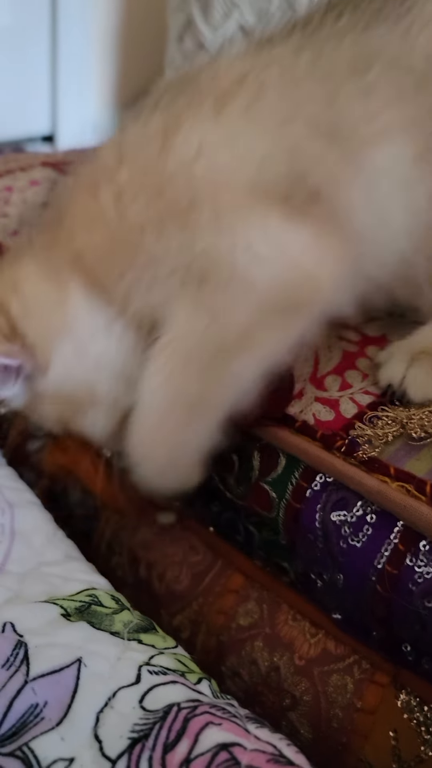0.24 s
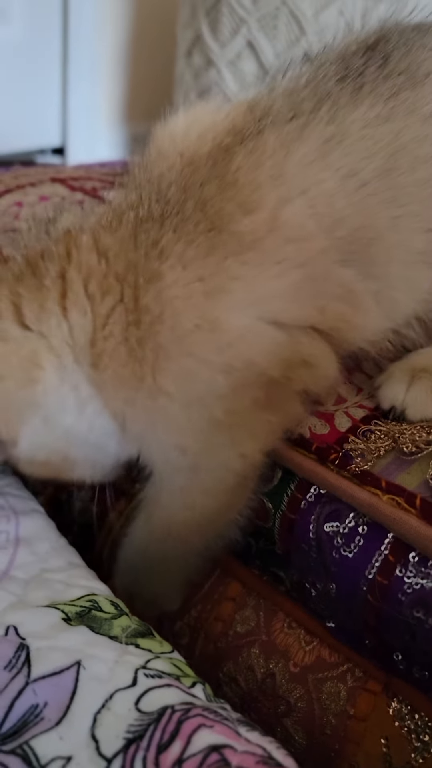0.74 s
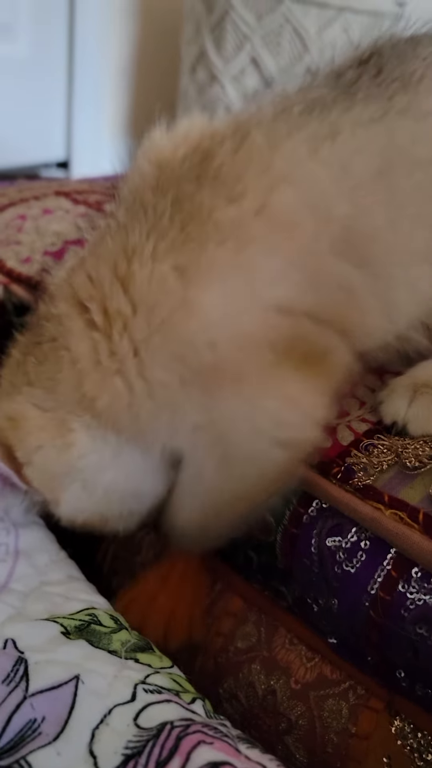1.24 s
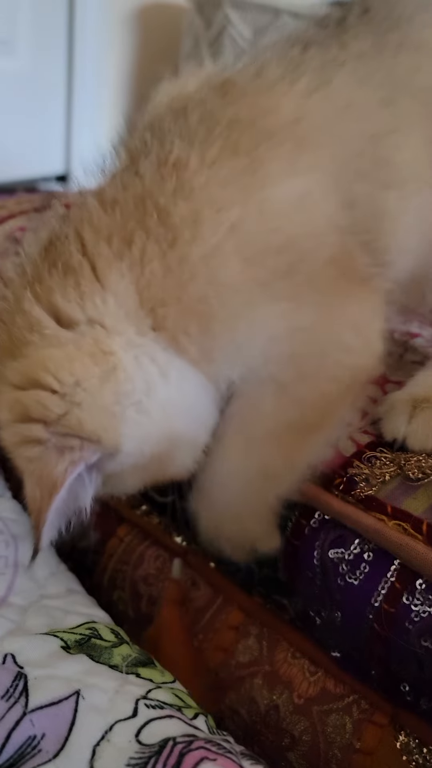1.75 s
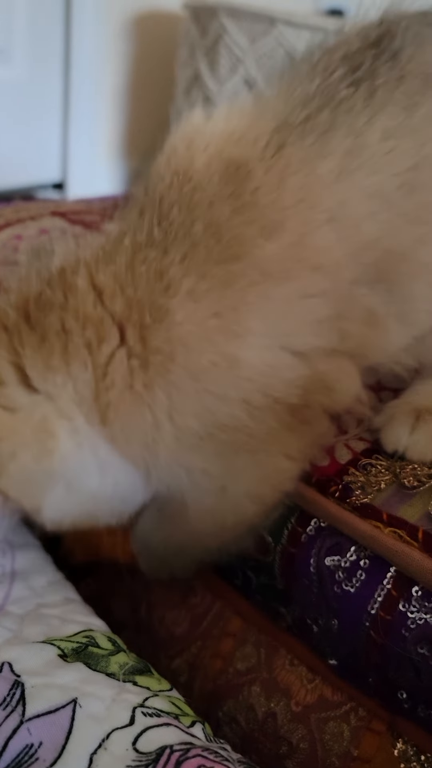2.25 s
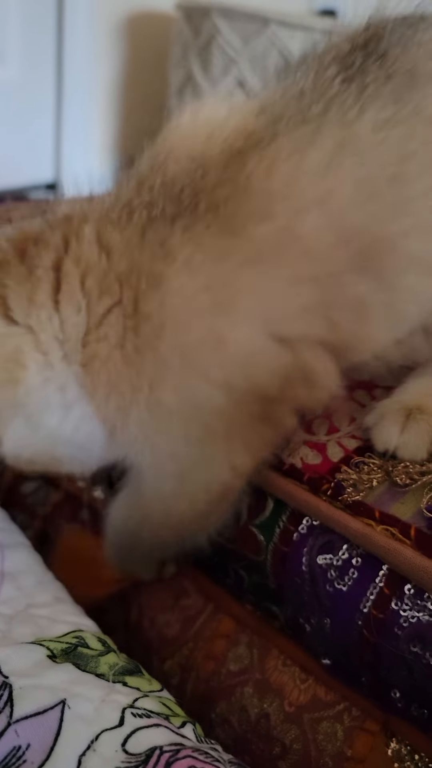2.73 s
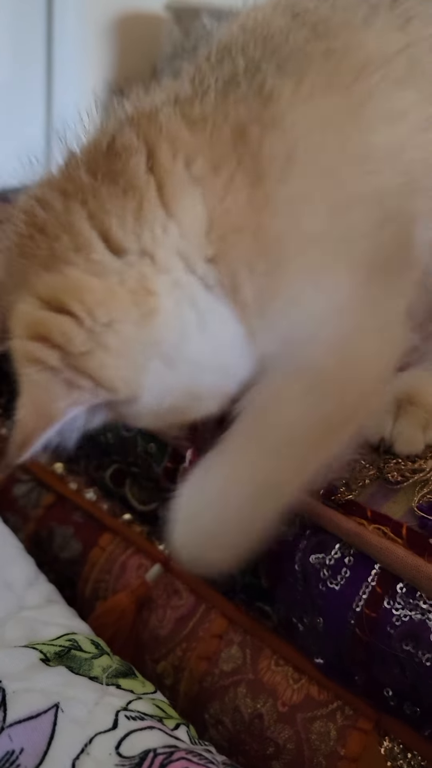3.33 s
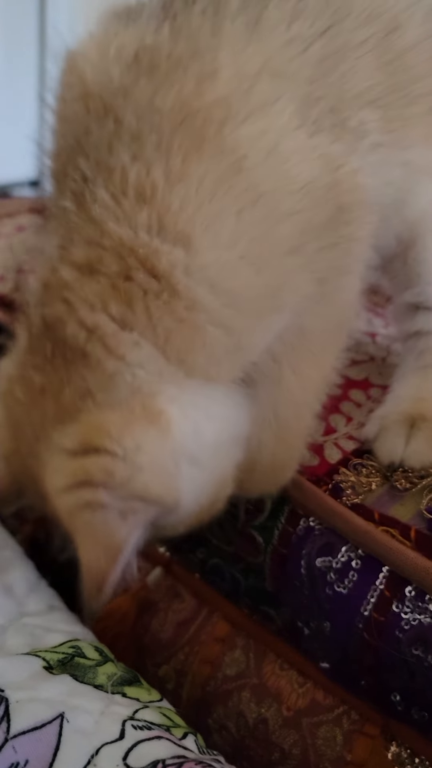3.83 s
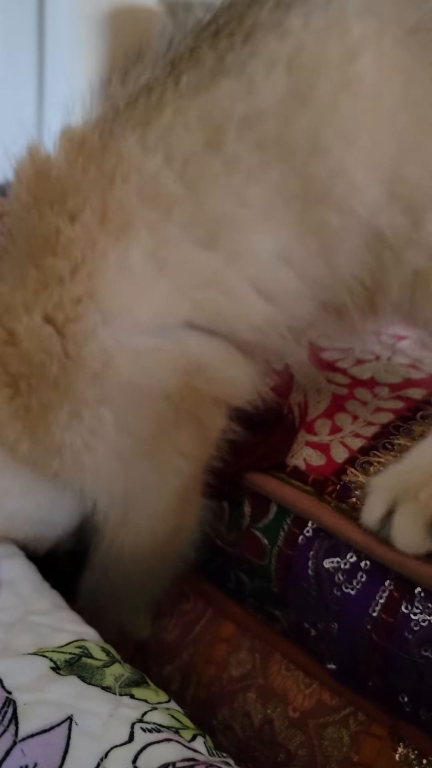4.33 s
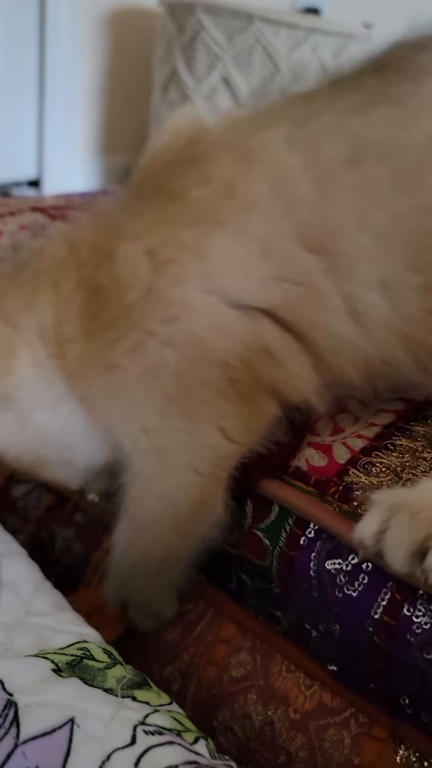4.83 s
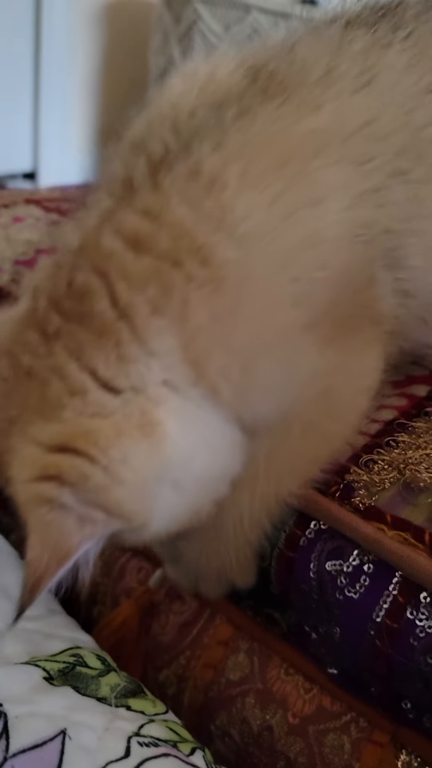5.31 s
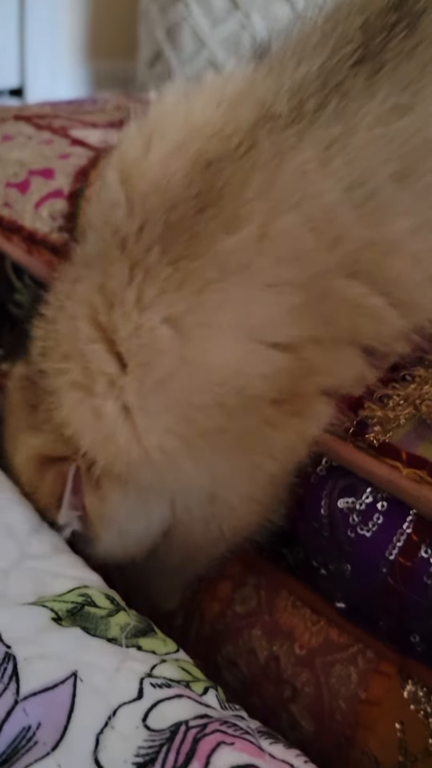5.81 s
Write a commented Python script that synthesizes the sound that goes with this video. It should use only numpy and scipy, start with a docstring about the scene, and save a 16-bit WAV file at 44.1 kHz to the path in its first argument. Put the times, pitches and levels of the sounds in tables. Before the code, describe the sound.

A kitten digs between embroidered pillows: claws snag and snap off threads with small clicks and dull thumps, dry fur-and-cloth rustles, faint low hum beneath.

```python
"""On a bed, a kitten digs between embroidered pillows: claws snag threads and snap free, thumping the stuffing.
Snaps and thumps are clicks ringing the modes of thread and pillow; short tones of steady pitch, quickly
dying away, puff the air. Fur and cloth rustle as fibre slips over noise. Two far motors beat slowly over
mains hum, airflow and room noise. Faint wall echoes and a diffuse tail follow the snaps, thumps and puffs.
A small two-port microphone is held close."""
import sys
import numpy as np
from scipy import signal
from scipy.io import wavfile

SR = 44100
rng = np.random.default_rng(int(sys.argv[2]) if len(sys.argv) > 2 else 0)


def persist_wave(psi):
    """Save psi, clipped to +-1, as 16-bit WAV."""
    counts = np.round(np.clip(psi, -1, 1) * 32767).astype(np.int16)
    wavfile.write(sys.argv[1], SR, np.atleast_2d(counts).T)


def invert_db(level):
    """Linear amplitude ratio for a level in decibels (20 dB per decade), elementwise."""
    return 10 ** (np.asarray(level, dtype=float) / 20)


N = 267584   # length in samples

# Two motors, then the mains. Each row: pitch in Hz, level in dB rms ahead of wobble and port tilt.
HUM_TONES = [(59.0, -51), (58.19, -57), (120.0, -58)]
MOTORS_IN_STEP_S = 0.87
# Colour of the room noise. Each row: frequency in Hz, relative density in dB per Hz.
ROOM_COLOUR = [(20, -20), (55, -1.5), (90, -12), (150, -12.5), (200, -12.5), (280, -31.5), (500, -27),
               (650, -35.5), (900, -29), (1900, -38), (2400, -48), (3000, -46), (4500, -54), (7000, -53.5),
               (9500, -65), (11500, -63), (13500, -61.5), (16500, -61)]
ROOM_DB = -55.5   # rms
# Left-right likeness of diffuse noise. Each row: frequency in Hz, likeness from -1 to 1.
LIKENESS = [(60, 0.84), (130, 1), (290, 0.5), (640, -0.65), (1410, -0.64), (3100, 0.015), (6820, -0.057),
            (15000, -0.073)]
# Tilt between the microphone ports. Each row: frequency in Hz, left minus right in dB.
PORT_TILT = [(60, -4.5), (150, -4.0), (380, -7), (950, -2), (2380, 6.5), (5980, 1.5), (15000, -5)]
# Plain wall echoes. Each row: delay in seconds, level in dB.
WALL_ECHOES = [(.0157, -24), (.0303, -33)]
BEDROOM_T60_S, TREBLE_T60_S, WALL_CUT_HZ = 0.57, 0.15, 600
# Airflow resonances. Each row: centre in Hz, width in Hz, level in dB rms.
AIRFLOW = [(207.6, 32, -69.5), (1958, 100, -85.5), (2890, 160, -90.5)]
# A narrow hiss swells now and then. Each row: start of the hold in seconds, hold in seconds, level in dB rms.
HISS_SWELLS = [(0.154, 0.14, -85), (1.62, 0.055, -92), (2.65, 0.1, -93), (3.254, 0.85, -86),
               (4.474, 0.1, -91), (5.596, .47, -91)]
HISS_HZ, HISS_WIDTH_HZ = 6740, 730
HISS_RISE_DB_PER_S, HISS_FALL_DB_PER_S, HISS_REST_DB = 75, 52, -101
# Colour of the fine fibres. Each row: frequency in Hz, relative density in dB per Hz.
FIBRE_COLOUR = [(1760, -30.5), (3000, -6), (3520, -11), (4110, -3.5), (6480, -11), (8230, -7.5),
                (10500, -36.5), (16000, -18)]
# Colour of the coarse weave. Each row: frequency in Hz, relative density in dB per Hz.
WEAVE_COLOUR = [(500, -3.5), (800, 5), (1500, -3.5), (2500, -13), (3500, -12.5)]
# The paw drags cloth over cloth. Each row: moment of greatest speed in seconds, hold in seconds,
# fine fibre level in dB, coarse weave level in dB.
STROKES = [(0.156, 0.023, -68.5, -62), (0.253, 0.026, -81.5, -64), (0.538, .15, -90, -84),
           (0.873, 0.009, -85, -78), (0.957, .02, -74, -68), (1.348, .012, -71, -61.5),
           (1.362, 0.0057, -66, -54), (1.596, 0.015, -71.5, -66.5), (1.77, 0.2, -88, -75),
           (1.98, 0.025, -89, -65.5), (2.09, 0.0052, -75, -65), (2.193, 0.013, -80, -79),
           (2.51, 0.02, -71.5, -62.5), (2.643, 0.013, -77, -66.5), (2.72, 0.056, -79.5, -75),
           (2.852, 0.022, -78, -74), (3.046, 0.015, -81, -65), (3.16, .02, -94, -75),
           (3.228, 0.062, -83, -67.5), (3.549, 0.03, -80, -66), (3.935, 0.023, -75, -67),
           (4.238, 0.022, -68, -64.5), (4.3, 0.039, -75.5, -71.5), (4.542, .02, -80, -66),
           (4.616, 0.08, -83, -68), (4.763, 0.018, -81, -70), (4.918, 0.042, -67.5, -60.5),
           (5.002, 0.077, -83.5, -67), (5.238, 0.032, -79, -80), (5.351, .03, -80, -71),
           (5.6, .03, -86, -73), (5.843, 0.036, -85.5, -69.5), (6.042, .03, -82, -67)]
RISE_DB_PER_S, FINE_FALL_DB_PER_S, WEAVE_FALL_DB_PER_S = 708, 296, 180
REST_FINE_DB, REST_WEAVE_DB = -98.5, -83.5   # fur stirring between strokes
# A claw snags a thread and the cloth springs back. Each row: start in seconds, nominal snap peak in dB,
# nominal thump peak in dB, pitch of the spot in Hz, brightness setting in dB.
SNAGS = [(0.1604, -22, -24.5, 288, 0), (0.88, -50, -45.5, 416, -3), (0.9552, -45, -41, 327, -24),
         (0.9628, -38, -25, 367, -3), (1.3549, -35, -27.5, 408, -36), (1.3726, -35, -30, 380, -18),
         (1.3758, -37.5, -37.5, 396, -0.5), (1.5869, -47, -36, 380, 9), (1.594, -39.5, -23, 213, 10.5),
         (1.7638, -54, -42, 227, -9), (1.9893, -50.5, -41, 219, -1), (2.094, -44, -39, 335, -1),
         (2.5012, -50, -33, 276, 5), (2.5134, -32, -22.5, 253, 5), (2.643, -53.5, -48.5, 330, -28),
         (2.6602, -53, -46.5, 326, -34), (2.857, -47, -30.5, 236, 7.5), (3.063, -59, -42.5, 305.5, 0),
         (3.2355, -54.5, -47.5, 318, -1), (3.2506, -44, -34.5, 343, -4), (3.5495, -58, -45, 310, -22),
         (3.56, -45.5, -39.5, 347, -33), (3.9289, -55, -33.5, 244, -23), (4.2626, -62, -43, 298, -22),
         (4.5311, -59.5, -34, 345, 8), (4.543, -47, -27, 364, -27.5), (4.554, -61, -51, 260, 15),
         (4.9374, -34, -27.5, 324, -12), (4.9431, -51, -47.5, 302, -12), (5.6213, -60, -43, 200, 1)]
# A claw tip ticks over a thread, hardly moving the pillow. Each row: start in seconds,
# nominal snap peak in dB, brightness setting in dB.
TICKS = [(1.3787, -30.5, -7), (1.3827, -49, -6), (1.7743, -56.5, -2), (1.7847, -51.5, -10),
         (1.8189, -53.5, 2.5), (1.829, -54.5, -18), (1.8615, -62, 6), (1.9155, -53, -7),
         (1.9364, -51.5, -5), (3.05, -50, -10), (3.1682, -56, -9), (3.175, -56.5, -10), (3.409, -53.5, -19),
         (3.872, -65, 0), (4.036, -74, 9), (5.135, -65, 2), (3.578, -66, -13), (4.239, -50, -6),
         (4.3094, -56.5, -17), (4.331, -55.5, 2), (4.9286, -43.5, 7.5), (5.385, -63.5, -15)]
# The thump of a -56 dB tick, its share of the snap's swing, and its pitch.
TICK_THUMP_DB, TICK_FOLLOWS, TICK_SPOT_HZ = -55, 0.32, 260
# A soft pad presses the pillow. Each row: start in seconds, nominal thump peak in dB, pitch of the spot in Hz.
PRESSES = [(0.2546, -42, 292), (0.3982, -41, 226), (0.6526, -45, 196), (0.9483, -34.5, 340),
           (1.2125, -46, 211), (1.6272, -43, 230), (1.9812, -55, 306), (2.1084, -42, 225),
           (2.189, -36.5, 262), (2.196, -33, 340), (2.2018, -40.5, 263), (2.5464, -53, 250),
           (3.073, -46.5, 221), (3.4556, -43.5, 239), (3.944, -53, 262), (4.7575, -49.5, 243.6),
           (4.7712, -45, 286), (5.078, -50.5, 406), (5.2546, -46.5, 280), (5.8558, -45.5, 277),
           (6.0399, -43, 532), (6.0494, -38.5, 356)]
# The faint dull snap of a -46 dB press, its share of the thump's swing, and its brightness.
PRESS_SNAP_DB, PRESS_FOLLOWS, PRESS_BRIGHT_DB = -73, 0.21, -29.5
# The paw digs where the lows reach the ports out of step. Each row: from in seconds, to in seconds.
BEHIND = [(1.34, 1.37), (2.63, 2.7), (3.34, 3.42)]
# Left share of the lows at a 280 Hz spot; higher spots lean right.
LEFT_SHARE, LEFT_LOSS_PER_OCTAVE, LEFT_SHARE_BEHIND = 0.21, 0.17, -0.2
# Modes of the stuffed pillow. Each row: pitch in Hz, relative level in dB, decay by 60 dB in seconds.
PILLOW_MODES = [(79.3, -2, 0.81), (149.5, -6.5, 0.34), (200, 0, 0.12), (240.5, -0.5, 0.12),
                (291.2, -3, 0.06), (340, -7, 0.065), (380, 3.5, 0.058), (483.6, -1, 0.046),
                (542.3, 9.5, 0.022), (783, 7.5, 0.018), (920, -23.5, 0.017)]
# Modes of a released thread. Each row: pitch in Hz, relative level in dB, decay by 60 dB in seconds.
THREAD_MODES = [(708, -2, 0.0059), (1090, 4.5, 0.0013), (1345, 3.5, 0.0023), (1713, 6.5, 0.002),
                (3110, 3.5, 0.004), (3790, 6.5, 0.0017), (5250, 6, 0.0019), (8370, -3.5, 0.0023),
                (10100, -8.5, 0.001), (14100, -8, 0.00068)]


def rms_one(x):
    """Scales a signal to rms 1."""
    return x / np.sqrt(np.mean(x ** 2) + 1e-20)


def at_hz(points, hz):
    """Reads a curve at a frequency, straight over log frequency."""
    freqs, values = np.array(points).T[:2]
    return np.interp(np.log(hz), np.log(freqs), values)


def drift(rate_hz):
    """Slow chance of spread 1: noise at every 40th sample through a double one-pole low-pass."""
    r = np.exp(-80 * np.pi * rate_hz / SR)
    noise = rng.standard_normal(N // 40 + 2002)
    slow = signal.lfilter([1], [1, -2 * r, r * r], noise)[2000:]   # skip the settling
    return np.interp(np.arange(N) / 40, np.arange(len(slow)), rms_one(slow))


def swells(s, hold_s, db, rise_db_per_s, fall_db_per_s, rest_db):
    """Level in dB: each swell rises, holds and falls; powers add over a resting level."""
    t = np.arange(0, N + 64, 64)[:, None] / SR
    rise_db = rise_db_per_s * np.maximum(s - t, 0)
    fall_db = fall_db_per_s * np.maximum(t - s - hold_s, 0)
    power = invert_db(2 * (db - rise_db - fall_db)).sum(axis=1) + invert_db(2 * rest_db)
    return np.interp(np.arange(N) / SR, t[:, 0], 10 * np.log10(power))


def ring(clicks, hz, t60):
    """A decaying resonance: a unit click sets a sine of height 1 ringing."""
    r, w = invert_db(-60 / (t60 * SR)), 2 * np.pi * hz / SR
    return signal.lfilter([0, np.sin(w)], [1, -2 * r * np.cos(w), r * r], clicks + 1e-18)


def narrow_noise(hz, width_hz):
    """Noise through one resonance, twice, partly shared by the ports; rms 1."""
    r, w = np.exp(-np.pi * width_hz / SR), 2 * np.pi * hz / SR
    section = [1, 0, -1, 1, -2 * r * np.cos(w), r * r]
    common, own = rng.standard_normal(N), rng.standard_normal((2, N))
    alike = np.clip(at_hz(LIKENESS, hz), 0, 1)
    both = np.sqrt(alike) * common + np.sqrt(1 - alike) * own
    return rms_one(signal.sosfilt([section, section], both))


def coloured(sources, spectrum, patchy_db):
    """Third-octave bands of mid and side sources, each with its own level, flicker and likeness; rms 1."""
    out, edges = 0, 20 * 2 ** np.arange(0, 9.8, 1 / 3)
    for k, (low, high) in enumerate(zip(edges, edges[1:])):
        hz = np.sqrt(low * high)
        if spectrum[0][0] <= hz <= spectrum[-1][0]:
            band = signal.butter(2, [low, high], "band", fs=SR, output="sos")
            mid, side = signal.sosfilt(band, sources[k % 2])   # neighbouring bands use separate sources
            alike = np.clip(at_hz(LIKENESS, hz), -1, 1)
            tilt_db = at_hz(PORT_TILT, hz) * np.array([[0.5], [-0.5]])
            gain = invert_db(at_hz(spectrum, hz) + patchy_db * drift(8) + tilt_db)
            out = out + gain * (np.sqrt(1 + alike) * mid + np.sqrt(1 - alike) * side * [[1], [-1]])
    return rms_one(out)


def room_noise():
    """Room noise: broad noise whose bands flicker gently."""
    return invert_db(ROOM_DB) * coloured(rng.standard_normal((2, 2, N)), ROOM_COLOUR, patchy_db=1.8)


def hum():
    """Motor and mains tones with a slight wobble; the two motors beat as they drift in and out of step."""
    t = np.arange(N) / SR - MOTORS_IN_STEP_S
    out = 0
    for hz, db in HUM_TONES:
        port_gain = invert_db(at_hz(PORT_TILT, hz) * np.array([[0.4], [-0.4]]))
        out = out + invert_db(db + 0.14 * drift(4.8)) * np.cos(2 * np.pi * hz * t) * port_gain
    return np.sqrt(2) * out   # rms to peak


def airflow():
    """Steady airflow: noise in a few narrow resonances."""
    return sum(invert_db(db) * narrow_noise(hz, width_hz) for hz, width_hz, db in AIRFLOW)


def hiss():
    """A narrow high hiss that comes and goes over a faint rest."""
    level_db = swells(*np.transpose(HISS_SWELLS), HISS_RISE_DB_PER_S, HISS_FALL_DB_PER_S, HISS_REST_DB)
    return invert_db(level_db) * narrow_noise(HISS_HZ, HISS_WIDTH_HZ)


def bedroom(x):
    """Two plain wall echoes, and a diffuse tail that swells in, its treble dying first."""
    t = np.arange(int(0.4 * SR)) / SR
    white = rng.standard_normal((2, len(t))) * (1 - np.exp(-(t / 0.04) ** 2))
    dull = signal.sosfilt(signal.butter(1, WALL_CUT_HZ, fs=SR, output="sos"), white)
    treble = invert_db(-14) * (white - dull) * invert_db(-60 * t / TREBLE_T60_S)
    tail = dull * invert_db(-60 * t / BEDROOM_T60_S) + treble
    out = invert_db(-48) * signal.fftconvolve(x, tail, axes=1)[:, :N]
    for delay_s, db in WALL_ECHOES:
        lag = int(delay_s * SR)
        out[:, lag:] += invert_db(db) * x[:, :-lag]
    return out


def rustle(fine_db, weave_db):
    """Hundreds of tiny fibre slips a second on a soft hiss, coloured as fine fibres and coarse weave."""
    shape = (2, 2, N)
    happens = rng.random(N) < 900 / SR   # 900 slips a second
    size = invert_db(6.34 * np.minimum(rng.exponential(1, N), 3))
    grains = happens * size * rng.standard_normal(shape)
    slips = 2.0 * grains + rng.standard_normal(shape)
    fine = invert_db(fine_db) * coloured(slips, FIBRE_COLOUR, patchy_db=2.2)
    return fine + invert_db(weave_db) * coloured(slips, WEAVE_COLOUR, patchy_db=2.5)


def contacts():
    """All touches as columns: s, snap dB, thump dB, spot Hz, brightness dB, left share of the lows."""
    ticks = [(s, db, TICK_THUMP_DB + TICK_FOLLOWS * (db + 56), TICK_SPOT_HZ, bright_db)
             for s, db, bright_db in TICKS]
    presses = [(s, PRESS_SNAP_DB + PRESS_FOLLOWS * (db + 46), db, hz, PRESS_BRIGHT_DB)
               for s, db, hz in PRESSES]
    columns = np.transpose(SNAGS + ticks + presses)
    left = LEFT_SHARE - LEFT_LOSS_PER_OCTAVE * np.log2(columns[3] / 280)
    behind = sum((columns[0] > a) & (columns[0] < b) for a, b in BEHIND) > 0
    return (*columns, np.where(behind, LEFT_SHARE_BEHIND, np.maximum(left, 0)))


def puffs():
    """The cloth jumping free pushes the air for a cycle or two, a little above the pitch of the spot."""
    s, _, thump_db, spot_hz, _, left = contacts()
    out, t = np.zeros((2, N + 900)), np.arange(900) / SR
    for at, db, hz, share in zip((s * SR).astype(int), thump_db - 1.5, 1.55 * spot_hz, left):
        cycles = hz * t
        puff = invert_db(db - 10.4 * cycles) * np.sin(2 * np.pi * cycles)
        out[:, at:at + len(t)] += puff * [[1.3 * share], [1]]
    return out[:, :N]


def thumps(weave_db):
    """Cloth springs back on the stuffing; modes near the spot's pitch ring most, low ones start later."""
    s, _, thump_db, spot_hz, _, left = contacts()
    out = np.zeros((2, N))
    chance = rng.standard_normal((len(s), 2, len(PILLOW_MODES)))
    for k, (hz, level_db, t60) in enumerate(PILLOW_MODES):
        at = ((s + (0.53 + 0.27 * np.abs(chance[:, 1, k])) / hz) * SR).astype(int)
        octaves_squared = np.log2(hz / spot_hz) ** 2
        off_pitch_db = 30 * octaves_squared / (1 + 2.18 * octaves_squared)
        blow = invert_db(thump_db + level_db - 8.0 - off_pitch_db + 1.87 * chance[:, 0, k])
        # sliding paws stir the stuffing too
        force = invert_db(weave_db - 34) * rng.standard_normal(N) * [[0.5], [1]]
        near = np.clip(200 / hz, 0, 1) ** 0.96   # long waves reach both ports alike
        force[0, at] -= blow * (0.63 * near + (1 - near) * 1.05 * left)
        force[1, at + int(hz / 80)] -= blow
        out += ring(force, hz, t60)
    return out


def snaps():
    """A thread slips off the claw in one crack and three small jerks within milliseconds, ringing its modes."""
    s, snap_db, _, _, bright_db, left = contacts()
    out = np.zeros((2, N))
    blend = rng.standard_normal((len(s), 2, len(THREAD_MODES)))   # each port hears its own blend of modes
    jerks = np.minimum(rng.exponential(1, (len(s), 2, 4)), 2) * [0, 1, 1, 1]
    light = np.clip(-27.5 - snap_db, 0, 35)   # light touches drag out and crumble
    spread = (16.0 + 1.8 * light)[:, None]   # samples
    at = (s * SR)[:, None] + spread * (jerks[:, 0] + [0, 0.49, 0.722, -0.58])
    jerk_db = (-14.0 + 0.21 * light)[:, None] * [0, 1, 1, 1] - 0.93 * jerks[:, 1]
    right_lag = rng.normal(0, 0.97, (len(s), 1))   # path difference in samples
    for k, (hz, level_db, t60) in enumerate(THREAD_MODES):
        tilt_db = 0.65 * bright_db * np.clip(np.log2(hz / 2900), -1.1, 1.4)
        for port in (0, 1):
            # out-of-step spots flip the lower modes at the left port
            sign = 1 if hz > 2500 or port else np.where(left < 0, -0.55, 1)[:, None]
            mode_db = snap_db + level_db + tilt_db - 6.5 + 1.33 * blend[:, port, k]
            size = invert_db(mode_db[:, None] + jerk_db)
            clicks = np.zeros(N)
            np.add.at(clicks, (at + port * right_lag).astype(int), (-1) ** k * sign * size)
            out[port] += ring(clicks, hz, t60)
    return out


def scene():
    """Strokes drive the rustle and stir the stuffing; snaps, thumps and puffs excite the bedroom."""
    s, hold_s, fine_db, weave_db = np.transpose(STROKES)
    fine_db = swells(s, hold_s, fine_db, RISE_DB_PER_S, FINE_FALL_DB_PER_S, REST_FINE_DB)
    weave_db = swells(s, hold_s, weave_db, RISE_DB_PER_S, WEAVE_FALL_DB_PER_S, REST_WEAVE_DB)
    background = room_noise() + hum() + airflow() + hiss()
    touches = puffs() + thumps(weave_db) + snaps()
    return background + bedroom(touches) + rustle(fine_db, weave_db) + touches   # the rustle stays dry


def roll_off(x):
    """The treble ends steeply here."""
    return signal.sosfilt(signal.butter(12, 16480, fs=SR, output="sos"), x)


def record(dry):
    """The microphone rolls off the deep bass below 42 Hz."""
    heard = signal.sosfilt(signal.butter(3, 42, "high", fs=SR, output="sos"), dry)
    return roll_off(heard)


dry = scene()
out = record(dry)
persist_wave(out)
```